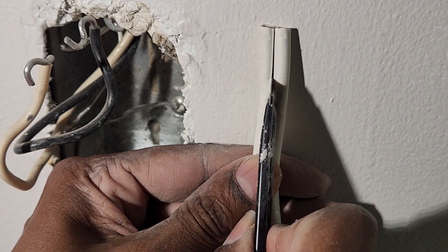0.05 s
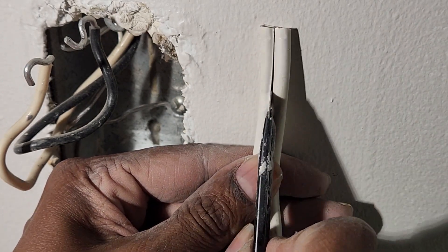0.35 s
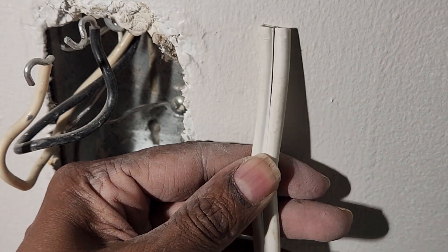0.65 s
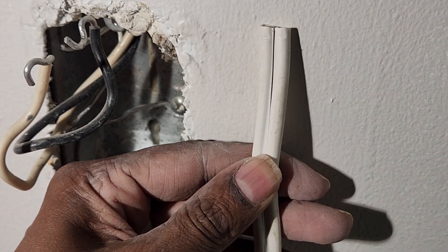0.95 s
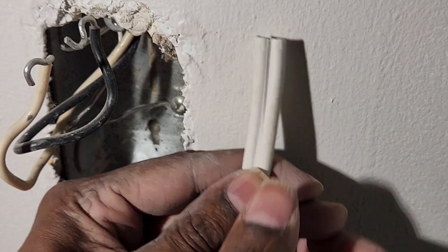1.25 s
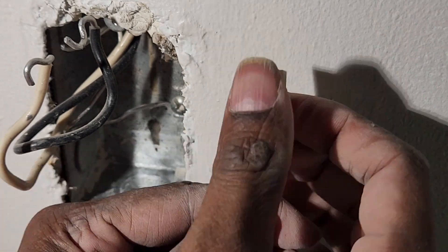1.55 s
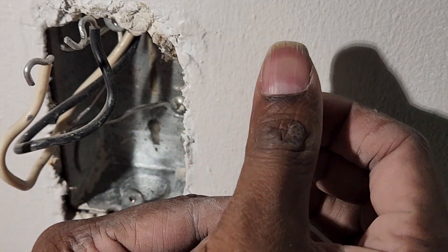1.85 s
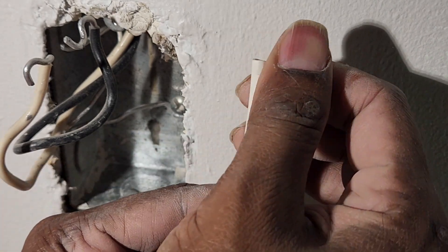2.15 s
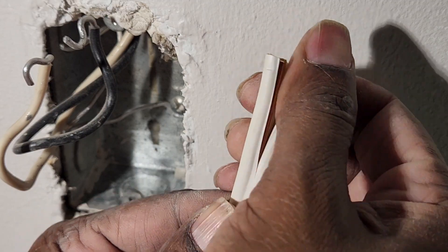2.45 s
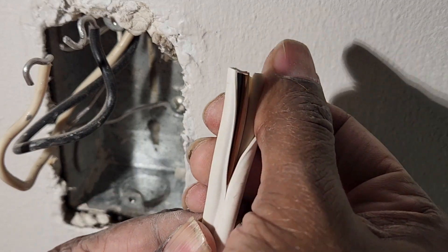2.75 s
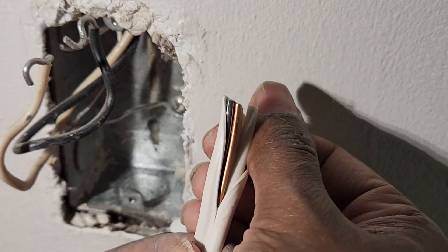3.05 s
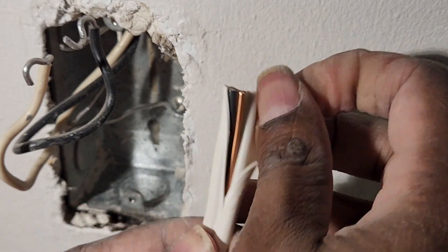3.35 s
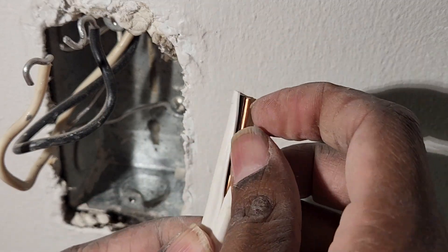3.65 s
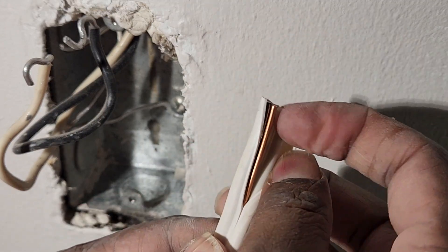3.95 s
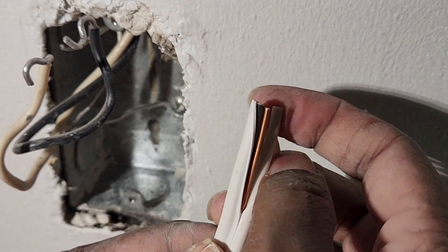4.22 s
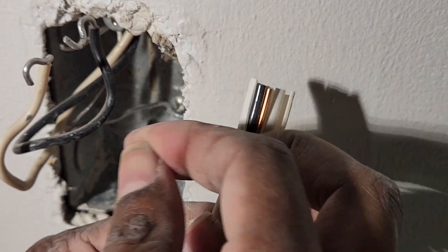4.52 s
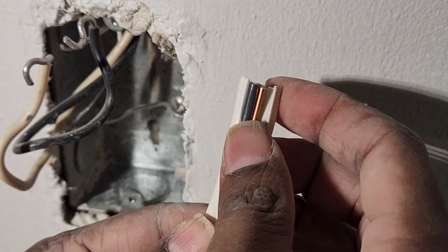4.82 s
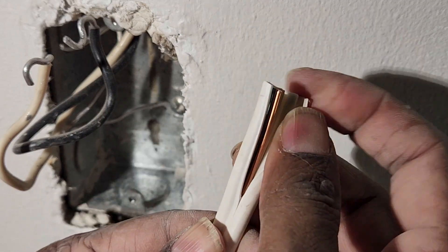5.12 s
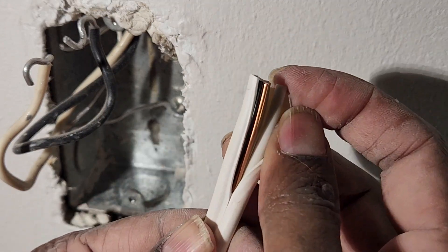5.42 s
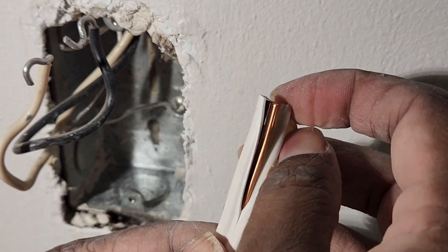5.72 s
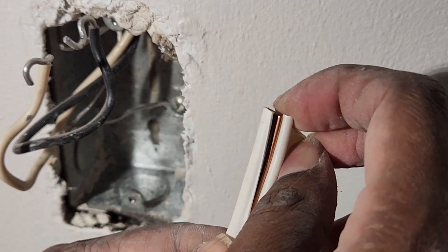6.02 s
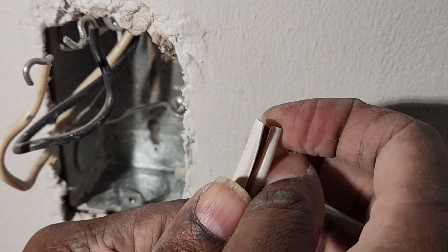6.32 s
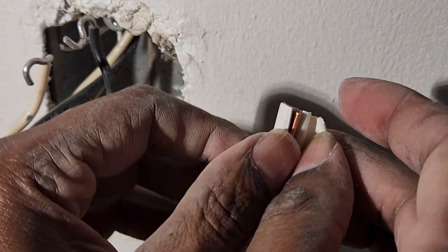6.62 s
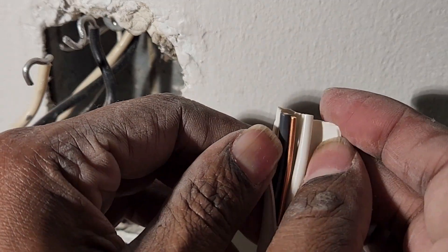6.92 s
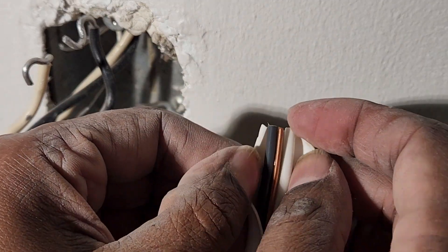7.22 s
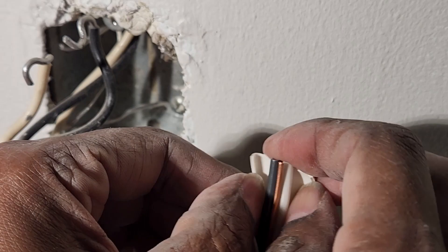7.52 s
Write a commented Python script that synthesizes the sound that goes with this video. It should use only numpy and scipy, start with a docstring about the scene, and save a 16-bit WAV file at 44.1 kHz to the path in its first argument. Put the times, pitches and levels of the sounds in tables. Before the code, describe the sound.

In a small, quiet room with a faint rumble, light squeaky blade scrapes give way to the bright clatter of a metal tool landing on a hollow surface. Close by, hands then work open a slit plastic cable jacket: irregular rustles, rasps, creaks and small clicks, mixed with hollow bumps on a plaster wall. One loud plastic snap comes last.

```python
"""Hands peel the slit plastic jacket off a stiff cable that hangs out of a hollow plaster wall.
Fingers rub, the jacket creaks, crackles and ticks, hand and cable knock the wall; last, a flap snaps free.
Early on, a blade skids down the jacket and the metal tool is put down: it clatters and rocks to rest.
Contacts are noise bursts and strokes are grainy friction, both filtered by damped resonances.
The room is small and quiet, with a low rumble and hum."""
import sys
import numpy as np
from scipy import signal
from scipy.fft import rfft, irfft, next_fast_len
from scipy.io import wavfile

SR = 44100
rng = np.random.default_rng(int(sys.argv[2]) if len(sys.argv) > 2 else 0)


def dump(signal):
    """Clip the signal to [-1, 1] and save it as 16-bit WAV at the path in sys.argv[1]."""
    limited = np.clip(np.atleast_2d(signal).T, -1, 1)
    pcm = np.round(limited * 32767).astype(np.int16)
    wavfile.write(sys.argv[1], SR, pcm)


N = 342657
FFT_SIZE = 8192


def from_db(db):
    """Decibels to gain."""
    return 10 ** (np.asarray(db) / 20)


def at_hz(points, hz):
    """Read a table on a log-frequency axis."""
    f, value = np.transpose(points)
    return np.interp(np.log(hz + 1e-3), np.log(f), value)


def between(values, share):
    """Read evenly spaced values at a share of 0-1."""
    return np.interp(share, np.linspace(0, 1, len(values)), values)


def freqs(size):
    """FFT bin frequencies in Hz."""
    return np.arange(size // 2 + 1) * SR / size


def add(out, time_s, x):
    """Mix a stereo sound in at time_s."""
    start = int(round(time_s * SR))
    lo, hi = max(start, 0), min(start + x.shape[1], N)
    if hi > lo:
        out[:, lo:hi] += x[:, lo - start:hi - start]


def place(x, pan_db, lag_s):
    """The left microphone port gets the sound louder and earlier."""
    n = np.arange(N)
    right = np.interp(n - round(lag_s * SR), n, x[1])
    return np.array([x[0], right]) * from_db([[pan_db / 2], [-pan_db / 2]])


def stereo_noise(size, split_hz=3220):
    """White noise, alike at both ports below split_hz, parting above."""
    mid, side = rfft(rng.standard_normal((2, size)))
    f = freqs(size)
    apart = np.hypot(0.9 * f / np.hypot(f, split_hz), from_db(-24))  # floor: port mismatch
    return irfft((mid + apart * side * [[1], [-1]]) / np.hypot(1, apart), size)


def body(colour, modes=()):
    """Minimum-phase impulse response: a broad colour plus modes at least 2 % wide."""
    f = freqs(FFT_SIZE)
    lift_db = sum(db / (1 + (2 * (f - hz) / max(width_hz, .02 * hz)) ** 2) for hz, width_hz, db in modes)
    lift_db = 17 * np.tanh(lift_db / 17)  # soft limit
    cepstrum = irfft(np.log(from_db(at_hz(colour, f) + lift_db)))
    cepstrum[1:FFT_SIZE // 2] *= 2
    cepstrum[FFT_SIZE // 2 + 1:] = 0
    return irfft(np.exp(rfft(cepstrum)))[None, :FFT_SIZE // 2]


def touched(modes, spread_db):
    """Each touch falls on another spot and reweights the modes."""
    return [(hz, width_hz, db + spread_db * rng.standard_normal()) for hz, width_hz, db in modes]


def grip(width_hz, lift_db, count=14):
    """Random modes set by where a thing is held; width_hz applies at 5 kHz."""
    pitches_hz = np.exp(rng.uniform(np.log(1500), np.log(15000), count))
    return [(hz, width_hz * np.sqrt(hz / 5000), lift_db) for hz in pitches_hz]


def strike(response, level_db, contact_s, spike, rise_share):
    """Pressure builds to a spike and dies in tiny slips; level_db is the RMS of the first 12 ms."""
    t = np.arange(FFT_SIZE // 2) / SR
    rise_s = np.clip(rise_share * contact_s, 1e-4, .02)
    slips = stereo_noise(len(t)) * np.minimum(t / rise_s, np.exp((rise_s - t) / contact_s))
    slips[:, int(rise_s * SR)] += spike * np.sqrt(np.sum(slips[0] ** 2))
    x = signal.fftconvolve(slips, response, axes=1)
    return from_db(level_db) * x / np.sqrt(np.mean(x[:, :int(.012 * SR)] ** 2))


def stroke(rise_s, fall_s, shape=2.0):
    """Time about a stroke's peak, and its speed; shape below 2 lengthens the tails."""
    reach = 8 ** (1 / shape)
    t = np.arange(-round(reach * rise_s * SR) - 1, round(reach * fall_s * SR) + 1) / SR
    return t, np.exp(-np.abs(t / np.where(t < 0, rise_s, fall_s)) ** shape)


def friction(response, speed, grain_db, slip_gain):
    """Uneven catches and about 220 sudden slips a second excite a body."""
    size = len(speed)
    knots = np.arange(0, size, 90)
    catches = np.interp(np.arange(size), knots, rng.standard_normal(len(knots)))
    slips = (rng.random(size) < 220 / SR) * rng.uniform(.5, 1, size) * slip_gain
    scrape = stereo_noise(next_fast_len(size, True))[:, :size] * from_db(grain_db * catches)
    x = signal.fftconvolve(scrape + slips, response, axes=1)[:, :size]
    return speed * x / x.std()


# room noise spectrum (frequency [Hz], gain [dB])
AIR_COLOUR = [(15, -30.5), (25, -3.5), (76, 0), (161, -12.5), (200, -16.5), (405, -22.5), (531, -33.5),
              (714, -27), (1000, -32), (2990, -35), (16000, -63)]
# hum bands (frequency [Hz], width [Hz], level [dB])
HUM_BANDS = [(48.3, 2.8, -51), (111.8, 3, -59.5), (221, 3, -69.5)]
def air(noise_db=-50.5):
    """Rumble and hum of the house under a faint hiss."""
    size = next_fast_len(N, True)
    f = freqs(size)
    noise = irfft(rfft(stereo_noise(size, split_hz=450)) * from_db(at_hz(AIR_COLOUR, f)), size)
    out = from_db(noise_db) * noise / noise.std()
    for hz, width_hz, level_db in HUM_BANDS:
        hum = irfft(rfft(rng.standard_normal(size)) / (1 + (2 * (f - hz) / width_hz) ** 2), size)
        out += from_db(level_db) * hum / hum.std()
    return out[:, :N]


# room decay (frequency [Hz], T60 [s])
ROOM_T60 = [(120, 0.3), (400, 0.19), (1200, 0.16), (3000, 0.15), (7000, 0.11), (14000, 0.09)]
def room(x, wet_db):
    """Add a short diffuse tail whose treble dies first."""
    size = 2 * FFT_SIZE
    t = np.arange(size) / SR
    white = rfft(stereo_noise(size, split_hz=1100))
    tail = 0
    for hz, t60_s in ROOM_T60:
        band = at_hz([(f, f == hz) for f, _ in ROOM_T60], freqs(size))
        tail = tail + irfft(white * band) * from_db(-60 * t / t60_s)
    tail *= 1 - np.exp(-(t / 0.004) ** 2)
    tail *= from_db(wet_db) / np.sqrt(np.sum(tail[0] ** 2))
    return x + signal.oaconvolve(x, tail, axes=1)[:, :N]


# wall panel resonances (frequency [Hz], width [Hz], lift [dB])
WALL_MODES = [(187, 95, 9), (320.4, 21, 12.5), (411, 73, 7.5), (550, 22, -2.5), (633, 24, 4.5),
              (762, 210, 10), (1044, 50, 8.5), (1360, 84, 9.5), (1586, 250, 11.5), (2200, 140, 6),
              (2570, 150, 5), (3140, 350, 2.5), (4080, 190, 6.5), (4860, 220, 3.5)]
# held cable spectrum (frequency [Hz], gain [dB])
RUSTLE_COLOUR = [(150, -10.5), (400, -1), (900, -9.5), (2000, 0.5), (4500, -10.5), (7500, -3), (10000, -14),
                 (16000, -31)]
def rustle(start_s=1.6, level_db=-69):
    """Fingers never quite rest, so the held jacket rustles."""
    t = np.arange(start_s, N / SR, 1 / SR)
    shifts_s = np.arange(start_s, N / SR, .08)
    unrest_db = 2.5 * np.interp(t, shifts_s, rng.standard_normal(len(shifts_s)))
    pressure = from_db(level_db + unrest_db)
    out = np.zeros((2, N))
    add(out, start_s, friction(body(RUSTLE_COLOUR, WALL_MODES), pressure, grain_db=3, slip_gain=1.4))
    return out


# tool and hollow surface resonances (frequency [Hz], width [Hz], lift [dB])
TOOL_MODES = [(1150, 230, 12), (2190, 220, 4), (4150, 160, 2.5), (4757, 190, 0.5), (5150, 1200, 1.5),
              (6340, 750, -4), (6760, 210, 1), (7500, 310, 4.5), (12300, 600, 6.5)]
BOARD_MODES = [(163, 40, 7), (520, 50, 4)]
# surface, handle, metal and top treble spectra (frequency [Hz], gain [dB])
THUD_COLOUR = [(40, -22), (90, -13), (165, -8), (260, -12), (520, -2), (900, -5.5), (3000, -41.5)]
CLACK_COLOUR = [(250, -28), (700, -7), (1100, 0), (1600, -2), (2500, -2), (3600, -9), (8000, -40)]
RING_COLOUR = [(1200, -35), (3000, -9), (4000, -1), (5500, 1.5), (7800, -2), (10000, -13.5), (16000, -30.5)]
SHEEN_COLOUR = [(4000, -40), (8000, 0), (10000, -1.5), (13000, -1), (16000, 0)]
def clink(ring_db, ring_hz, handle_db, contact_s, mode_scale=1):
    """One tool contact: the surface thuds, the handle clacks, the metal rings briefly."""
    modes = touched(TOOL_MODES, spread_db=0.5) + grip(width_hz=230, lift_db=2.5)
    modes = [(hz, width_hz, mode_scale * db) for hz, width_hz, db in modes]
    board = body(THUD_COLOUR, BOARD_MODES)
    handle = body(CLACK_COLOUR, modes + [(2583, 590, mode_scale * 2)])
    metal = body(RING_COLOUR, modes + [(ring_hz, 800, mode_scale * 6), (ring_hz, 260, mode_scale * 9)])
    dull_db = 0.45 * handle_db + .2 * (-15.5 - ring_db)  # handle-heavy or weak hits are duller
    sheen_db = ring_db - 14 - dull_db
    thud = strike(board, ring_db - 12.5, 1.1 * contact_s, spike=.85, rise_share=.33)
    clack = strike(handle, ring_db + handle_db, contact_s, spike=1, rise_share=.35)
    ring = strike(metal, ring_db, .91 * contact_s, spike=.35, rise_share=.7)
    sheen = strike(body(SHEEN_COLOUR, modes), sheen_db, 1.1 * contact_s, spike=.1, rise_share=.97)
    return thud + clack + ring + from_db([[-2.2], [2.0]]) * sheen  # top treble beams right


# surface boom spectrum (frequency [Hz], gain [dB])
BOOM_COLOUR = [(30, -24), (70, -11), (100, -7), (130, -0.5), (175, 0.5), (260, -8.5), (520, -13),
               (900, -16.5), (2000, -41.5)]
# its resonances (frequency [Hz], width [Hz], lift [dB])
BOOM_MODES = [(163, 44, 13), (520, 45, 9)]
# bounces (time [s], ring level [dB], ring [Hz], handle re ring [dB], boom re ring [dB])
LANDINGS = [(1.144, -14, 4100, -12.5, -4), (1.163, -11.5, 6800, -27.5, -10.5),
            (1.17, -19, 12500, -23.5, -25), (1.24, -14.5, 4270, -4, -17), (1.2643, -15.5, 4760, -9, -9.5),
            (1.268, -16, 3903, -5.5, -22), (1.297, -12.5, 5160, -16, -23.5),
            (1.3072, -16.5, 4970, -22, -13), (1.3352, -32.5, 5160, -4.5, -3.5),
            (1.378, -46.5, 5100, -1, 2.5), (1.528, -32.5, 5200, -7.5, -16),
            (1.8435, -54.5, 5670, 15.5, -17), (1.918, -76.5, 2900, 20, -15)]
# rocking contacts (time [s])
ROCKS_S = [1.411, 1.4541, 1.5, 1.586, 1.639]
def tool(settle_s=.005, fade_db_per_s=43):
    """The tool bounces, its weight booms in the hollow surface, and it rocks to rest on its side."""
    out = np.zeros((2, N))
    boom = body(BOOM_COLOUR, BOOM_MODES)
    for time_s, ring_db, ring_hz, handle_db, boom_db in LANDINGS:
        add(out, time_s, clink(ring_db, ring_hz, handle_db, contact_s=.0036))
        weight = strike(boom, ring_db + boom_db, contact_s=.008, spike=2.2, rise_share=.19)
        add(out, time_s + settle_s, weight)
    for time_s in ROCKS_S:
        ring_db = -39 - fade_db_per_s * (time_s - ROCKS_S[0])
        add(out, time_s, clink(ring_db, ring_hz=5000, handle_db=3, contact_s=.004, mode_scale=.14))
    wall_echo = np.zeros((2, N))
    add(wall_echo, .0102, from_db(-16.5) * out)
    return out + wall_echo


# sliding spectra (frequency [Hz], gain [dB])
DRAG_COLOUR = [(100, -20.5), (320, 3.5), (800, -3.5), (1600, -5.5), (3000, -6.5), (5000, -15), (10000, -32)]
HISS_COLOUR = [(1000, -26.5), (3000, -3), (4500, -1), (7500, 5.5), (10000, -1.5), (16000, -28.5)]
def slide(length_s, drag_db, hiss_db, hiss_mode, sheen_db):
    """Friction on the split jacket, a short resonant tube. Returns (lead before the peak [s], sound)."""
    t, speed = stroke(.52 * length_s, .48 * length_s, shape=1.35)
    jacket = grip(width_hz=170, lift_db=5, count=12)
    tube_hz = 490 * rng.uniform(.92, 1.08)
    tube = [(k * tube_hz, 150, 7) for k in range(3, 13)]
    drag = body(DRAG_COLOUR, touched(WALL_MODES, spread_db=0.5) + tube)
    hiss = body(HISS_COLOUR, jacket + tube + [hiss_mode])
    x = from_db(drag_db) * friction(drag, speed, grain_db=4.5, slip_gain=12)
    x += from_db(hiss_db) * friction(hiss, speed, grain_db=4, slip_gain=15)
    x += from_db(sheen_db) * friction(body(SHEEN_COLOUR, jacket), speed, grain_db=3.5, slip_gain=9)
    return -t[0], x


# squeak band (frequency [x pitch], gain [dB])
SQUEAK_BAND = [(.6, -36), (.85, -14), (.96, -1), (1.04, -1), (1.15, -14), (1.7, -26), (2.6, -44)]
# hard-edge strokes (peak time [s], length [s], squeak level [dB], pitch [Hz])
SKIDS = [(0.621, 0.085, -58, 5100), (0.767, 0.13, -58, 5600), (0.891, 0.059, -54.5, 5400),
         (0.948, 0.049, -60, 5700), (1.065, .042, -53.5, 4300), (6.932, 0.05, -59.5, 5730),
         (7.302, 0.067, -63.5, 4420)]
def skids():
    """Blade or nail skids along the jacket: hiss and a narrow squeak."""
    out = np.zeros((2, N))
    for time_s, length_s, db, hz in SKIDS:
        lead_s, x = slide(length_s, db - 15, db - 5, hiss_mode=(hz, 1100, 4), sheen_db=db - 14.5)
        add(out, time_s - lead_s, x)
        t, speed = stroke(.36 * length_s, .78 * length_s)
        squeak = body([(hz * ratio, gain_db) for ratio, gain_db in SQUEAK_BAND])
        add(out, time_s + t[0], from_db(db) * friction(squeak, speed, grain_db=5, slip_gain=3))
    return place(out, pan_db=5, lag_s=.00012)


# finger strokes (peak time [s], length [s], base level [dB], pressure [0-1])
RUBS = [(0.038, 0.13, -59.5, 0.38), (2.24, 0.023, -62, 0), (2.434, 0.12, -54.5, 0.98),
        (2.594, 0.031, -48.5, 0.06), (3.222, 0.023, -50, 0), (3.314, 0.13, -56, 0.61),
        (3.393, .02, -54, 0.36), (3.44, 0.034, -41, 0.23), (3.488, 0.047, -46.5, 0.12),
        (3.568, 0.066, -62, 0.1), (3.857, 0.067, -58.5, 0.44), (4.061, 0.047, -57, 0.06),
        (4.488, 0.07, -48, 0.36), (4.644, 0.06, -51.5, 0.37), (4.942, 0.025, -50.5, 0.19),
        (5.072, 0.047, -57.5, 0.32), (5.174, 0.038, -57.5, 0.43), (5.866, 0.089, -58.5, 0.41),
        (6.128, 0.035, -51.5, 0.89), (6.277, 0.09, -49, 0.43), (6.605, 0.091, -47.5, 0.36),
        (7.338, 0.033, -52, 0.37), (7.678, 0.052, -45.5, 0.5)]
def rubs():
    """Fingers rub the jacket: a light one hisses high, a firm one rasps low."""
    out = np.zeros((2, N))
    for time_s, length_s, db, pressure in RUBS:
        drag_db = db + between((-25, 3.5, 2), pressure)
        hiss_db = db + between((-4.5, -2, -26), pressure)
        sheen_db = db + between((-3, -8.5, -32), pressure)
        hiss_hz = between((7500, 4700, 4050), pressure)
        lead_s, x = slide(length_s, drag_db, hiss_db, (hiss_hz, 1200, 10), sheen_db)
        add(out, time_s - lead_s, x)
    return place(out, pan_db=4.5, lag_s=.00012)


# tick spectrum for a 5 kHz ring (frequency [Hz], gain [dB])
TICK_COLOUR = [(400, -38), (1500, -11), (2800, -7.5), (4000, -1), (5500, 0.5), (7000, -9.5), (11000, -12),
               (16000, -29)]
# ticks (time [s], level [dB], ring [Hz])
TICKS = [(1.716, -59, 6970), (2.453, -39.5, 9800), (2.542, -59.5, 4500), (2.62, -56, 9000),
         (2.645, -47, 11100), (2.832, -42.5, 6070), (2.847, -48.5, 5000), (2.858, -58, 5150),
         (2.869, -59, 4700), (3.505, -53, 11000), (3.696, -45.5, 7150), (4.347, -52.5, 7610),
         (4.514, -41, 5900), (5.139, -68, 6970), (5.189, -54, 6970), (5.213, -60, 4600), (5.232, -50, 4460),
         (5.349, -40.5, 4840), (5.6248, -46.5, 4600), (6.499, -56, 2483), (6.571, -61.5, 4970),
         (6.828, -53, 3050), (6.843, -60.5, 5200), (7.176, -58, 6020), (7.327, -52, 7500),
         (7.5394, -43, 4140), (7.656, -46, 11900)]
def ticks():
    """Short bright ticks: the tool's last rock, then the jacket's edges slipping."""
    out = np.zeros((2, N))
    for time_s, level_db, ring_hz in TICKS:
        colour = [(hz * (ring_hz / 5000) ** 1.2, db) for hz, db in TICK_COLOUR]
        tick = body(colour, [(ring_hz, 1500, 4)])
        add(out, time_s, strike(tick, level_db, contact_s=.0024, spike=.1, rise_share=.24))
    return place(out, pan_db=2.5, lag_s=.00005)


# jacket flap resonances (frequency [Hz], width [Hz], lift [dB])
FLAP_MODES = [(323, 50, 9), (740, 90, 7), (1215, 70, 11), (1430, 70, 9), (1600, 80, 10), (2120, 70, 8),
              (2600, 110, 11), (3120, 150, 12), (4090, 150, 12), (4850, 150, 13), (5430, 170, 7)]
# crackle spectrum (frequency [Hz], gain [dB])
CRACKLE_COLOUR = [(1000, -21), (2500, 0), (4200, -6), (5600, -1), (7000, -12), (15000, -20)]
# tears (peak time [s], length [s], level [dB])
CRACKLES = [(2.59, 0.056, -50.5), (2.639, 0.029, -35.5), (2.745, 0.028, -49), (2.849, .05, -49.5),
            (2.928, .036, -58.5), (4.453, .012, -43), (4.702, .025, -66), (6.334, 0.054, -51),
            (6.793, 0.078, -55.5)]
def crackles(fibres_per_s=420):
    """Fibres give way ahead of a tear, each flicking the flap."""
    out = np.zeros((2, N))
    for time_s, length_s, db in CRACKLES:
        t, speed = stroke(length_s / 2, length_s / 2)
        breaks = (rng.random(len(t)) < fibres_per_s / SR) * rng.standard_normal(len(t))
        modes = touched(FLAP_MODES, spread_db=2) + grip(width_hz=130, lift_db=8, count=10)
        x = signal.fftconvolve(breaks, body(CRACKLE_COLOUR, modes)[0])[:len(t)]
        add(out, time_s + t[0], from_db(db) * speed * x / (x.std() + 1e-9) * np.ones((2, 1)))
    return place(out, pan_db=2, lag_s=.00013)


# hollow creak spectrum (frequency [Hz], gain [dB])
CREAK_COLOUR = [(100, -24), (320, 2), (550, -2.5), (850, 1), (1550, -5.5), (2100, -5.5), (4200, -19),
                (6000, -28), (12000, -40)]
# stick-slip runs (peak time [s], length [s], level [dB], slip rate [Hz])
CREAKS = [(2.302, 0.026, -51, 300), (2.628, 0.034, -44, 420), (3.738, 0.064, -44.5, 360),
          (3.934, 0.046, -43, 470), (4.282, 0.048, -62, 330), (4.458, 0.033, -37.5, 310),
          (4.997, 0.036, -47, 380), (6.711, .03, -48, 340)]
def creaks(jitter=.1207, spread_db=3, scrape_db=-5):
    """The bent jacket sticks and slips under a thumb, shaking cable and wall."""
    out = np.zeros((2, N))
    for time_s, length_s, db, slip_hz in CREAKS:
        t, speed = stroke(length_s / 2, length_s / 2)
        hollow = body(CREAK_COLOUR, WALL_MODES + grip(width_hz=130, lift_db=-3.5))
        gaps, sizes = rng.standard_normal((2, 80))
        onsets = (np.cumsum(np.exp(jitter * gaps)) * SR / slip_hz).astype(int)
        inside = onsets < len(t)
        slips = np.zeros(len(t))
        slips[onsets[inside]] = from_db(spread_db * sizes[inside])
        creak = signal.fftconvolve(slips, hollow[0])[:len(t)]
        scrape = from_db(scrape_db) * friction(hollow, speed, grain_db=4, slip_gain=8)
        add(out, time_s + t[0], from_db(db) * (speed * creak / creak.std() + scrape))
    return place(out, pan_db=3.5, lag_s=.00019)


# rasp spectrum (frequency [Hz], gain [dB])
RASP_COLOUR = [(100, -10), (300, -0.5), (520, -2.5), (1000, -10), (1600, -3.5), (3000, -13), (5400, -22),
               (6500, -18), (10000, -25.5), (16000, -37)]
# thumb drags (peak time [s], length [s], level [dB])
RASPS = [(2.594, 0.066, -43.5), (2.929, 0.039, -52.5), (4.448, 0.014, -37), (4.591, 0.041, -48.5),
         (4.717, 0.053, -45), (6.332, .065, -40.5), (6.747, 0.071, -46), (6.803, 0.081, -45)]
def rasps(mode_scale=1.6):
    """A thumb drags the stiff flap over the wires; dense slips keep it ringing."""
    out = np.zeros((2, N))
    for time_s, length_s, level_db in RASPS:
        t, speed = stroke(length_s / 2, length_s / 2)
        modes = [(hz, width_hz, mode_scale * db) for hz, width_hz, db in touched(FLAP_MODES, spread_db=2)]
        rasp = friction(body(RASP_COLOUR, modes), speed, grain_db=5.5, slip_gain=24)
        add(out, time_s + t[0], from_db(level_db) * rasp)
    return place(out, pan_db=2.5, lag_s=.00024)


# wall thump and finger pad spectra (frequency [Hz], gain [dB])
THUMP_COLOUR = [(30, -23.5), (70, -4.5), (120, 0.5), (165, -4), (260, -6.5), (500, -27.5), (2000, -57)]
PAD_COLOUR = [(60, -44), (170, -10), (240, -15), (330, 3.5), (480, -3.5), (850, -11.5), (1500, -22.5),
              (3000, -33.5), (8000, -41)]
# soft contacts (time [s], base level [dB], emphasis [Hz], contact [s], thump re base [dB])
BUMPS = [(2.158, -40.5, 320, 0.0087, 3), (2.459, -40, 380, 0.014, -3), (2.551, -41, 310, .01, -2),
         (2.799, -36.5, 402, 0.006, -4), (2.815, -45.5, 299, 0.0073, 5.5), (2.9, -44, 400, .006, -3),
         (2.931, -49, 420, 0.013, -4), (3.049, -45, 351, 0.0061, 2.5), (3.159, -51, 337, 0.0064, 3),
         (3.72, -47, 378, 0.013, -1), (4.1217, -44.5, 380, 0.0055, -12.5), (4.386, -44.5, 380, 0.01, -11.5),
         (4.43, -45, 380, .014, -16), (4.691, -36.5, 503, 0.0078, -18), (4.795, -48.5, 322, 0.014, -1),
         (4.892, -52, 400, 0.013, -13), (4.962, -45.5, 842, 0.013, -24), (5.087, -50, 895, 0.011, -17.5),
         (5.625, -33.5, 325, .004, -18), (6.536, -44.5, 300, 0.017, 5.5), (6.592, -38, 320, 0.012, -4.5),
         (6.707, -45, 593, 0.014, -6), (6.766, -50.5, 395, 0.015, 4)]
def bumps():
    """A finger pad bumps the cable: a round knock and thump in the wall, then a scuff on the jacket."""
    out = np.zeros((2, N))
    thump = body(THUMP_COLOUR)
    for time_s, db, hz, contact_s, thump_db in BUMPS:
        wall = body(PAD_COLOUR, touched(WALL_MODES, spread_db=3) + [(hz, .5 * hz, 6)])
        add(out, time_s, strike(wall, db - 2.5, contact_s, spike=.3, rise_share=.45))
        add(out, time_s, strike(thump, db + thump_db, contact_s, spike=.63, rise_share=.36))
        t, speed = stroke(contact_s, 2.4 * contact_s)
        flap = body(CREAK_COLOUR, touched(FLAP_MODES, spread_db=2.5))
        scuff = friction(flap, speed, grain_db=5, slip_gain=14)
        add(out, time_s + contact_s + t[0], from_db(db - 7.5) * scuff)
    return place(out, pan_db=2, lag_s=.00019)


# wall and plastic crack spectra (frequency [Hz], gain [dB])
WALL_COLOUR = [(60, -39.5), (170, -13), (245, -11), (320, -2.5), (450, 0.5), (800, -6.5), (1500, -8),
               (2500, -13), (4000, -30.5), (9000, -58)]
CRACK_COLOUR = [(600, -23.5), (1800, -1), (2700, 0), (4500, -4.5), (6500, -11.5), (9000, -17.5),
                (15500, -32)]
# knocks (time [s], level [dB], emphasis [Hz], weight [0-1], hardness [0-1], thump re knock [dB])
KNOCKS = [(1.098, -29.5, 1100, 0.85, 0.86, -16), (1.16, -30, 520, 0.96, 0.9, -5),
          (1.214, -27, 900, 0.84, 0.92, -3.5), (1.531, -37, 610, 0.66, 0.45, -9),
          (1.787, -37.5, 329.5, 0.82, 0.79, -8.5), (2.574, -41.5, 306, 0.63, 0.99, -1),
          (2.631, -29, 440, 0.3, 0.8, -11), (2.641, -23.5, 443, 0.39, 0.63, -12.5),
          (2.65, -29, 400, 0.35, 0.5, -11), (2.736, -29.5, 420, 0.46, 0.5, -6.5),
          (2.751, -41.5, 330, 0.14, 0.57, -1), (3.632, -37, 339, 0.46, 0, -6.5),
          (3.9184, -29.5, 450, 0.3, 0.57, -20), (3.9248, -31, 450, 0, 0.63, -20),
          (3.928, -28, 467, 0.29, 0.57, -31), (3.9349, -31.5, 795, 0.24, 0.5, -28),
          (3.95, -40, 450, .3, .2, -22), (3.9646, -28.5, 475, 0.25, 0.69, -19),
          (4.5604, -25.5, 510, 0.27, 0.51, -11.5), (4.575, -36, 720, .5, 0.57, -5),
          (5.186, -41.5, 350, 0.43, 0.92, -8.5), (5.623, -30.5, 324, 0.05, 0.62, -20),
          (6.279, -26.5, 479, 0, 0.05, -15.5), (6.5172, -30, 441, 0.62, 0.36, -7.5),
          (7.1099, -32.5, 1200, 0.45, 0.81, -7), (7.133, -34.5, 393, 0.74, 0.55, -6.5),
          (7.1441, -34, 430, 0.49, 0.4, -12)]
def knocks(knee_hz=800):
    """Hollow knocks: the landing tool thuds, and hand and cable hit the wall."""
    out = np.zeros((2, N))
    thump = body(THUMP_COLOUR)
    t, speed = stroke(rise_s=.008, fall_s=.019)  # scuff into each contact
    for time_s, wall_db, emphasis_hz, weight, hardness, thump_db in KNOCKS:
        contact_s = np.exp(between(np.log((.0032, .016)), weight))
        crack_db = wall_db + between((-25.5, -0.5), hardness)
        tilt_db_per_oct = between((-6, 3), hardness)
        modes = touched(WALL_MODES, spread_db=-2) + grip(width_hz=990, lift_db=3)
        colour = [(hz, db + tilt_db_per_oct * max(np.log2(hz / knee_hz), 0)) for hz, db in WALL_COLOUR]
        wall = body(colour, modes + [(emphasis_hz, .4 * emphasis_hz, 8)])
        plastic = body(CRACK_COLOUR, modes)
        add(out, time_s + t[0], from_db(wall_db - 19) * friction(wall, speed, grain_db=0, slip_gain=20))
        add(out, time_s, strike(thump, wall_db + thump_db, 1.8 * contact_s, spike=.16, rise_share=.27))
        add(out, time_s, strike(wall, wall_db, 1.3 * contact_s, spike=.47, rise_share=.36))
        add(out, time_s, strike(plastic, crack_db, .85 * contact_s, spike=.25, rise_share=.3))
    return place(out, pan_db=1.8, lag_s=.00018)


# slap spectrum (frequency [Hz], gain [dB])
SLAP_COLOUR = [(60, -17), (130, -8), (220, -9.5), (500, -3.5), (900, -4), (1500, -4.5), (2400, -7.5),
               (3200, -12.5), (4400, -16), (6200, -25), (10000, -35.5), (16000, -39)]
# its resonances (frequency [Hz], width [Hz], lift [dB])
SLAP_MODES = [(388, 90, 3), (807, 110, 4), (1080, 100, 5), (1410, 100, 6), (1920, 100, 4), (2310, 130, 5),
              (4310, 170, 6), (5390, 220, 5)]
def flap_snap(time_s=7.6568, level_db=-11):
    """The bent flap slips, then lets go: a hard slap and a thump in the wall."""
    out = np.zeros((2, N))
    slap, thump = body(SLAP_COLOUR, SLAP_MODES), body(THUMP_COLOUR)
    t, speed = stroke(rise_s=.0044, fall_s=.026)
    add(out, time_s + t[0], from_db(level_db - 17) * friction(slap, speed, grain_db=5.5, slip_gain=12))
    add(out, time_s, strike(slap, level_db, contact_s=.00538, spike=.4, rise_share=.3))
    add(out, time_s, strike(thump, level_db - 12.5, contact_s=.012, spike=.52, rise_share=.27))
    return place(out, pan_db=1, lag_s=.0002)


def scene():
    """Tool and hands in one small room, over its air."""
    clatter = room(tool(), wet_db=-10.5)
    hands = knocks() + flap_snap() + bumps() + ticks()
    hands += rubs() + rasps() + crackles() + skids() + creaks() + rustle()
    return clatter + room(hands, wet_db=-12) + air()


def record(dry):
    """Clip at full scale, then low-pass at 16 kHz."""
    lowpass = signal.ellip(12, .1, 90, 16000, fs=SR, output="sos")
    return signal.sosfilt(lowpass, np.clip(dry, -1, 1))


dry = scene()
out = record(dry)
dump(out)
```